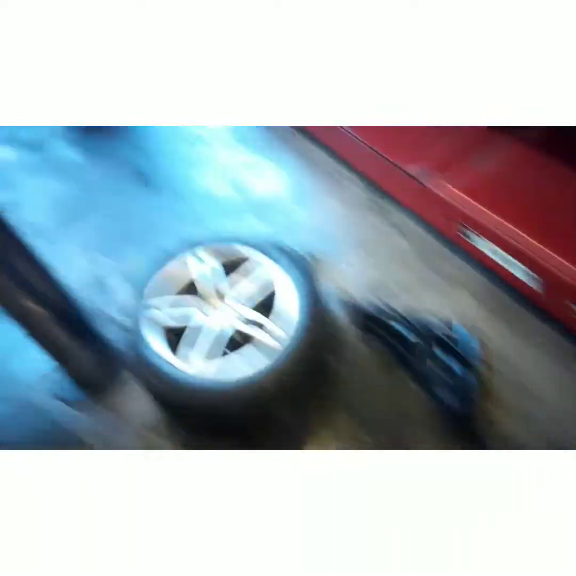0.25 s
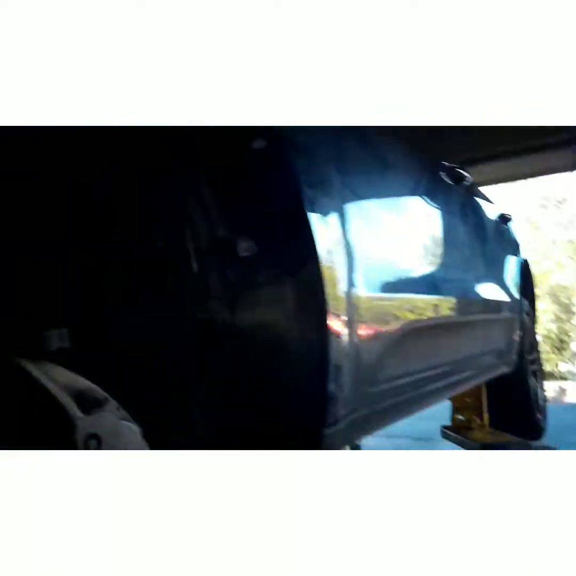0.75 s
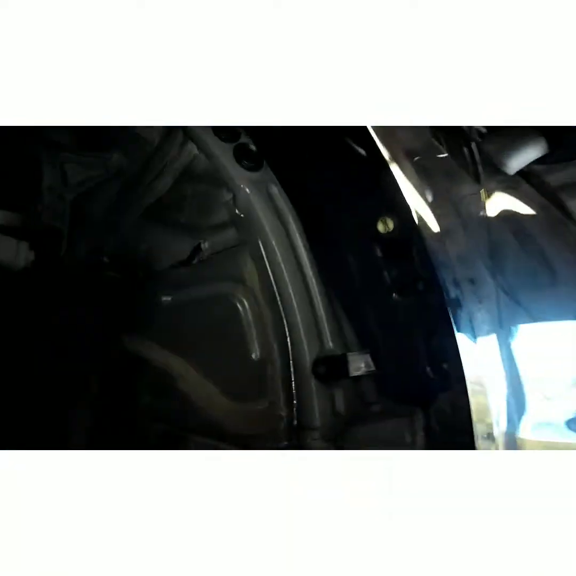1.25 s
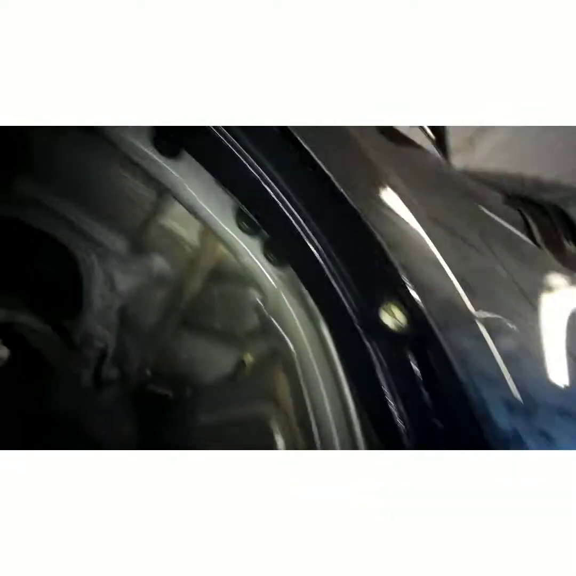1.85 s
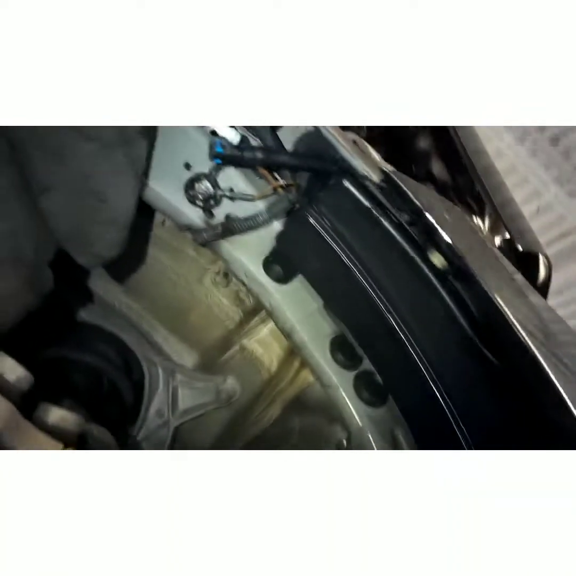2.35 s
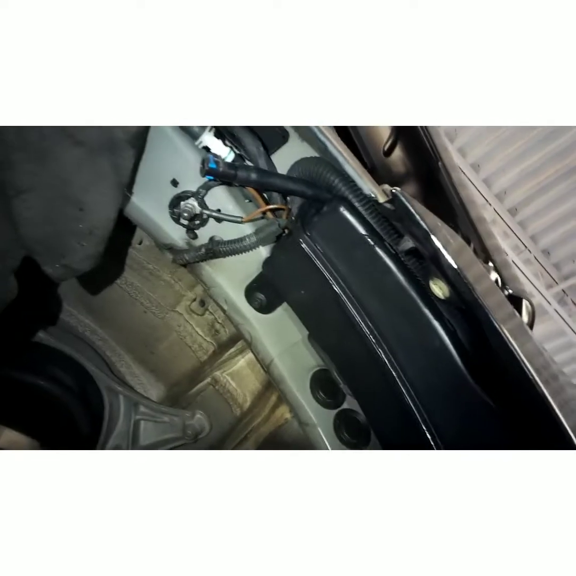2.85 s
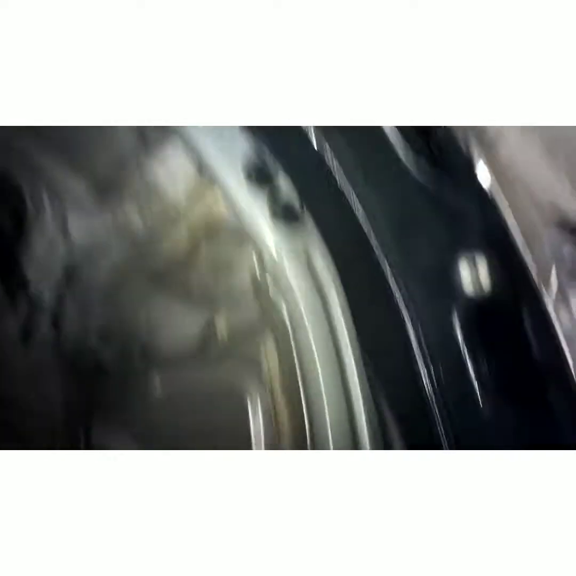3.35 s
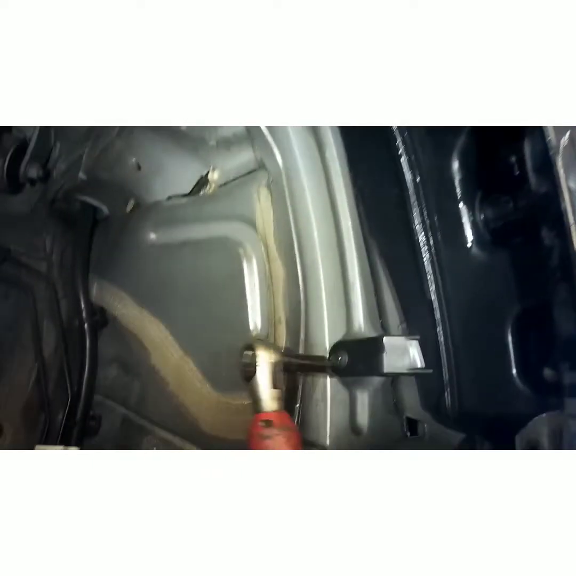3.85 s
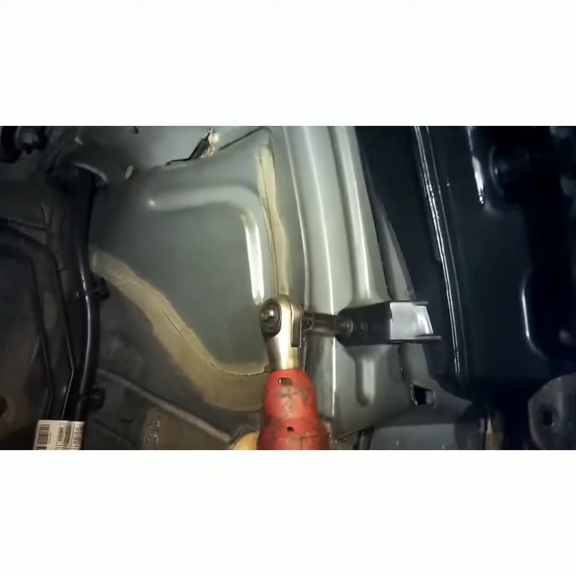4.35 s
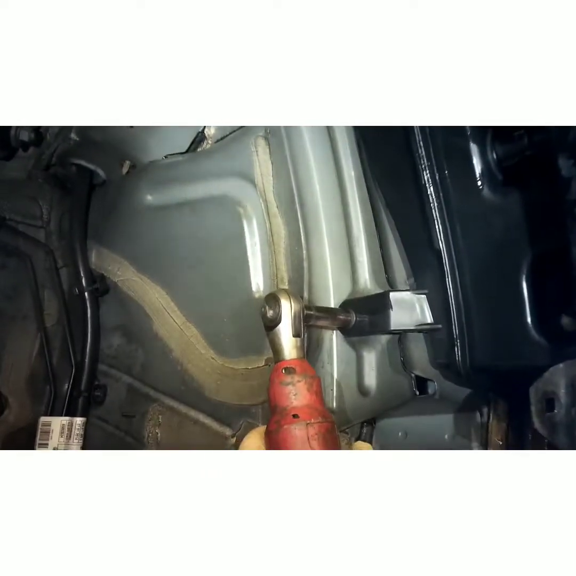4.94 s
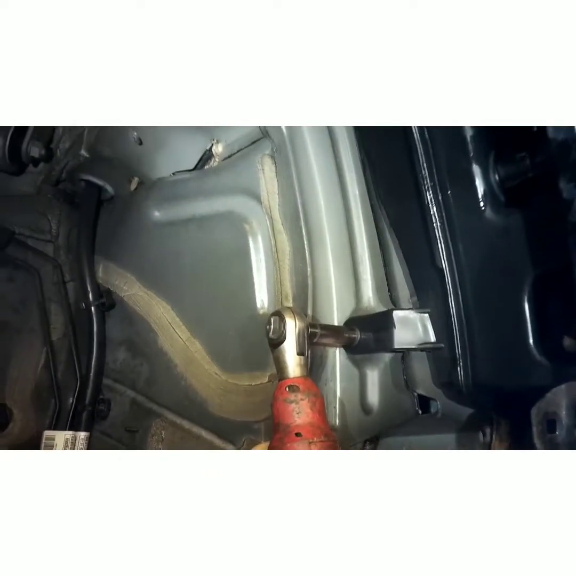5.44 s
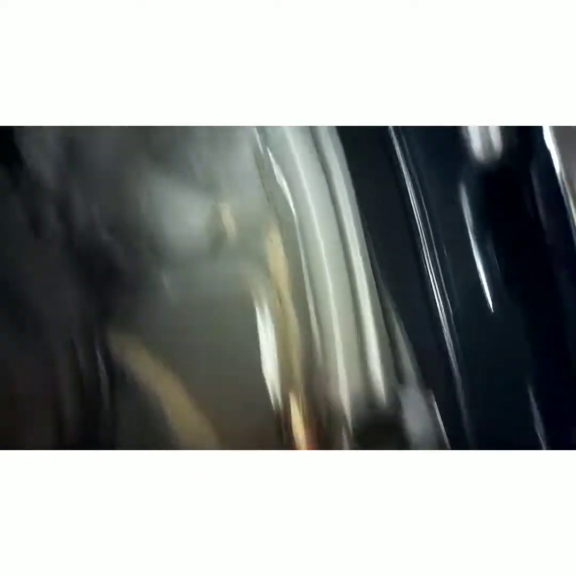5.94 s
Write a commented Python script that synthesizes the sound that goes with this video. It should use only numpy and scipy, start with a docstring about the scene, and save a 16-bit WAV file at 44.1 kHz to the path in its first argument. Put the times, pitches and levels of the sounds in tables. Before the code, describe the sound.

A close microphone hears quiet handling first: soft thuds, cloth rustle, scattered dry clicks over a wavering workshop hum. A short, crisp ratchet burst winds down in sharp ticks. After a pause, metal clacks on metal and the tool runs again, now loud, hollow and rattling through a car panel, its pitch sagging before the final heavy knocks and a short garage reverberation.

```python
"""Garage: a cordless ratchet is blipped in the air close by, clatters and coasts to a stop.
Its socket knocks onto a bolt in a wheel arch; the second run drives the bolt out and shakes the sheet metal.
Handling clicks, soft bumps, moving air, rustling sleeves and a wavering workshop hum lie underneath.
Crank-timed impulses and scraping noise ring modal filters of head, spring and panel; single contacts
ring the same bodies; filtered noise and sines make the background; a noise tail makes the room."""
import sys
import numpy as np
from scipy import signal
from scipy.fft import rfft, irfft
from scipy.io import wavfile
from scipy.ndimage import uniform_filter1d

SR = 44100
rng = np.random.default_rng(int(sys.argv[2]) if len(sys.argv) > 2 else 0)


def wrap_up_sound(samples):
    """Save the sound to the file named by the first command line argument, as 16-bit audio."""
    columns = np.atleast_2d(samples).T
    # keep every value between -1 and 1, then stretch to whole-number steps
    tamed = np.clip(columns, -1, 1)
    steps = np.round(tamed * 32767).astype(np.int16)
    wavfile.write(sys.argv[1], SR, steps)


N = 273947
TIME = np.arange(N) / SR  # s
GRID_HZ = np.fft.rfftfreq(8192, 1 / SR)

# workshop air, spectrum shape: f/Hz, relative density/dB
AIR_SPECTRUM = [(25, -25), (50, -20), (80, -8.5), (110, -13), (160, -13.5), (250, -18), (400, -17.5),
                (700, -23.5), (1250, -17.5), (2400, -29.5), (4000, -40), (8000, -46.5), (14000, -45.5),
                (15600, -65)]
# sleeve rustle, spectrum shape: f/Hz, relative density/dB
RUSTLE_SPECTRUM = [(200, -11), (700, -8.5), (1250, -3), (2000, -10), (2700, -14.5), (5300, -20.5),
                   (6500, -29), (14000, -40), (15600, -45)]
# arm movements that rustle the sleeves: middle t/s, half length/s, level/dB
ARM_MOVES = [(0, 0.081, -46.5), (0.546, 0.84, -56.5), (1.26, 0.22, -56.5), (3.36, 0.25, -54),
             (4.205, 0.26, -51.5), (6.077, 0.23, -42)]
# garage decay: f/Hz, t60/s
GARAGE_T60 = [(100, 0.59), (500, 0.62), (1500, 0.63), (4000, 0.46), (8000, 0.52), (15000, .3)]
# soft bumps: t/s, level/dB, f/Hz
SOFT_BUMPS = [(0.119, -27.5, 113), (.14, -30, 330), (.151, -28, 231), (2.226, -37, 170),
              (2.271, -36.5, 79.9), (2.319, -39.5, 91), (4.385, -31, 50.6)]
# clicks of the handled tool: t/s, peak level/dB, brightness f/Hz
HANDLING_CLICKS = [(0.731, -28.5, 4100), (0.762, -29.5, 8000), (.783, -29, 7900), (1.1225, -21.5, 4700),
                   (1.333, -29, 4200), (1.499, -29.5, 5980), (1.5123, -25, 5000), (2.961, -41, 16000),
                   (4.18, -40, 3520), (4.252, -36, 3200)]
# socket on bolt: t/s, peak level/dB, scrape/s, brightness f/Hz, thud level/dB, thud f/Hz, rebound step/dB
SOCKET_KNOCKS = [(3.8955, -9.5, 0.011, 3200, -23, 430, -31), (4.033, -2, 0.007, 4520, -23, 426, -24),
                 (5.886, -8.5, .003, 1500, -24.5, 253, -22), (5.9004, 0, 0.003, 1490, -8, 660, -11.5),
                 (6.02, -10, 0.027, 2800, -35.5, 790, -13)]
# single pawl clicks, mostly as the motor stops: t/s, peak level/dB, scrape/s
PAWL_CLICKS = [(1.87, -13.5, .003), (1.955, 3.5, 0.0011), (2.166, 1, 0.0009), (2.3855, -10.5, 0.0064),
               (2.417, -12.5, 0.0045), (2.439, -16, .0058), (2.455, -27, .002), (2.468, -8.5, .0018),
               (2.497, -14, 0.0048), (2.54, -15.5, 0.0018), (2.591, -26.5, .005)]
# ratchet head resonances: f/Hz, width/Hz, level/dB
HEAD_MODES = [(1078, 315, 0.5), (1283, 56, 5.5), (1700, 160, -9), (2060, 260, -1.5), (3370, 294, -6.5),
              (3860, 450, 1), (5070, 1200, -0.5), (7180, 680, -8), (8640, 1700, -7), (10830, 600, -8.5),
              (12360, 1100, 4), (14200, 3500, -6)]
# pawl spring resonances: f/Hz, width/Hz, level/dB
SPRING_MODES = [(12000, 130, -0.5), (12140, 290, -2), (12900, 590, -7), (13900, 1100, -14)]
# wheel arch resonances: f/Hz, width/Hz, level shaken by the tool/dB, level knocked through the bolt/dB
PANEL_MODES = [(374.5, 24, -9.5, -8.5), (423, 36, -8, -23), (523.4, 23, -13, -7.5), (740, 17, -11, -3),
               (914, 99, -14, -14.5), (987, 36, -5, -18), (1105, 63, -7, -3), (1193, 83, -7.5, -36),
               (1326, 47, -3, -18), (1401.5, 42, 2.5, 1), (1485, 65, -18, -4.5), (1622, 72, -1.5, -6.5),
               (1696, 36, -13, -19), (1834, 62, -3, -1.5), (1928, 44, 0.5, -7), (2028, 124, -3.5, -8),
               (2183, 38, 0, -3.5), (2392.5, 38, -1.5, -4), (2479, 78, -5, -3), (2885, 115, -7.5, -26),
               (3040, 120, -12, -14), (3310, 520, -16.5, -18.5), (4170, 350, -17.5, -16),
               (5000, 820, -41, -25), (5500, 170, -15, -18), (5810, 75, -19.5, -23)]
# tool housing response: f/Hz, level/dB
HOUSING_RESPONSE = [(100, -22), (350, -16.5), (650, -3.5), (950, 4.5), (1300, 0.5), (1700, -23.5),
                    (4000, -53)]
# rocking bolt response: f/Hz, level/dB
WOBBLE_RESPONSE = [(40, -42), (110, -19.5), (190, -1), (300, -3.5), (420, 6), (600, -15), (1500, -61)]
# shading of the head inside the arch: f/Hz, level/dB
ARCH_SHADE = [(1000, -16.5), (5000, 7.5), (7000, 7.0), (8200, 4.5), (9500, 10),
              (11000, 0.5), (12200, -0.5), (14500, 3.5)]
# speed on the bolt: t/s, strokes per second/Hz
BOLT_SPEED_HZ = [(4.27, 52), (4.4, 101), (4.53, 113), (4.97, 112.8), (5.2, 99.5), (5.5, 87), (5.72, 68.5),
                 (5.88, 44)]
# shaking of the panel, before the surge: t/s, level/dB
PANEL_EFFORT_DB = [(4.275, -39.5), (4.322, -12.5), (4.4, -9), (4.46, -15.5), (4.6, -14), (5.03, -16),
                   (5.61, -15), (5.7, -17), (5.845, -19), (5.872, -34.5)]

AIR_DB = -53
BAND_EDGE_HZ = 15880
# chance ticks
TICKS_PER_S, TICK_DB, TICK_HZ = 1.3, -44.5, 4000
HANDLING_SCRAPE_S = 0.0041
# gap and thud pitch ratio from one rebound to the next
REBOUND_S, REBOUND_PITCH = 0.015, 0.46
# brightness of a 1 ms pawl scrape; longer ones dull by this power of length
PAWL_BRIGHT_HZ, PAWL_DULLING = 20000, 0.29
# start level of a run, relative to full
ONSET_DB = -32
# free run: trigger pressed, trigger let go, last even stroke
FREE_ON_S, FREE_OFF_S, FREE_END_S = 1.85, 1.9385, 2.383
# spin-up, then coast: drag alone halves speed in COAST_S, friction takes the rest
START_HZ, TOP_HZ, SPIN_UP_S, COAST_S, FRICTION_HZ_PER_S = 55, 108.1, .06, .2894, 23.74
# bolt run
BOLT_ON_S, BOLT_END_S = 4.275, 5.88
# pawl bites hardest as the bolt first gives; later the bolt comes loose
BITE_S, BITE_HALF_S, LOOSE_S, LOOSENING_S = 4.355, 0.037, 5.47, 0.015
# only a rasp above this pitch is left of the loose bolt's rattle
RASP_LOW_HZ = 1100


def gain_of(db):
    """Decibels to amplitude."""
    return 10 ** (np.asarray(db) / 20)


def evened(x):
    """Scales to rms 1."""
    return x / np.sqrt(np.mean(x ** 2) + 1e-20)


def read(points, hz):
    """Interpolates a spectrum on a log-frequency axis."""
    f, value = np.transpose(points)
    return np.interp(np.log(hz + 1), np.log(f + 1), value)


def curve(rows):
    """Control curve (t/s, value) at every sample."""
    rows = np.array(rows)
    return np.interp(TIME, rows[:, 0], rows[:, 1])


def swell(middle_s, half_s):
    """Gaussian rise to 1 and fall."""
    return np.exp(-((TIME - middle_s) / half_s) ** 2)


def envelope(start_s, attack_s, hold_s, fade_db_per_s):
    """Relative level in dB of a run that swells, holds and dies away."""
    age_s = np.maximum(TIME - start_s, 0)
    onset_db = ONSET_DB * np.exp(-age_s / attack_s)
    return onset_db - fade_db_per_s * np.maximum(age_s - hold_s, 0)


def add(mix, s, sound):
    """Adds a sound into the mix at time s."""
    part = mix[max(round(s * SR), 0):][:len(sound)]
    part += sound[:len(part)]


def drift(hz):
    """Slow random wander of rms 1, Gaussian low-pass at hz."""
    spectrum = rfft(rng.standard_normal(N))
    rolloff = np.exp(-(np.fft.rfftfreq(N, 1 / SR) / hz) ** 2)
    return evened(irfft(spectrum * rolloff, N))


def hiss(points):
    """Steady noise of rms 1 with a given spectrum."""
    spectrum = rfft(rng.standard_normal(N))
    gain = gain_of(read(points, np.fft.rfftfreq(N, 1 / SR)))
    return evened(irfft(spectrum * gain, N))


def resonant(modes, low_hz, top_hz):
    """Gain of a body radiating through its resonances, between two steep edges."""
    power = sum(gain_of(db) ** 2 / (1 + (2 * (GRID_HZ - hz) / width_hz) ** 2) ** 1.19
                for hz, width_hz, db in modes)
    low_edge = 1 + (low_hz / (GRID_HZ + 1)) ** 6
    top_edge = 1 + (GRID_HZ / top_hz) ** 6
    return np.sqrt(power / low_edge / top_edge)


def panel_modes(column):
    """Wheel arch modes, weighted for the running tool (column 2) or a knock (column 3)."""
    return [(row[0], row[1], row[column]) for row in PANEL_MODES]


def soft(bright_hz):
    """Treble loss of a softer contact."""
    return 1 / np.sqrt(1 + (GRID_HZ / bright_hz) ** 4)


def ring(x, gain):
    """Passes x through the minimum-phase filter that has this gain."""
    log_gain = np.log(np.maximum(np.r_[gain, gain[-2:0:-1]], 1e-5))
    response = np.exp(np.conj(signal.hilbert(log_gain)))
    taps = np.fft.ifft(response).real[:len(gain)]
    return signal.oaconvolve(x, taps)[:len(x)]


def scatter(x):
    """A jolt runs to and fro along the socket extension: all-passes spread it over milliseconds."""
    for delay in (23, 41, 67):
        gap = np.zeros(delay)
        x = signal.lfilter(np.r_[.6, gap, 1], np.r_[1, gap, .6], x)
    return x


def hit(gain, peak_db, scrape_s, snap):
    """A contact snaps, scrapes briefly and rings a body."""
    t = TIME[:6000]
    force = rng.standard_normal(len(t)) * np.exp(-t / scrape_s)
    force /= np.linalg.norm(force)
    force[0] += snap
    sound = ring(force, gain)
    return gain_of(peak_db) * sound / abs(sound).max()


def clicks(rows):
    """Small blows ring the ratchet head."""
    out, head = np.zeros(N), resonant(HEAD_MODES, low_hz=763, top_hz=17000)
    for s, peak_db, scrape_s, bright_hz in rows:
        add(out, s, hit(head * soft(bright_hz), peak_db, scrape_s, snap=0.62))
    return out


def strokes(speed_hz, landing_s, offset, scrape_s, uneven_db):
    """One blow per crank turn, offset turns after the one at landing_s: impulses, and their scrapes."""
    turns = np.cumsum(speed_hz) / SR
    turns = turns + .007 * drift(45)  # gear play makes strokes early or late
    phase = turns - np.interp(landing_s, TIME, turns) - offset
    at = np.flatnonzero(np.diff(np.floor(phase)) > 0)
    blows = np.zeros(N)
    blows[at] = gain_of(uneven_db * rng.standard_normal(N)[:len(at)])
    age = TIME[:2000] / scrape_s
    grip = signal.oaconvolve(blows, age * np.exp(-age))[:N]  # teeth bite, then slip free
    return evened(blows), evened(grip * rng.standard_normal(N))


def played(x, level_db, span_s):
    """Levels out a running sound's rms and holds it at level_db within span_s."""
    power = uniform_filter1d(uniform_filter1d(x ** 2, size=2200), size=1500)
    inside = (TIME > span_s[0]) & (TIME < span_s[1])
    running = uniform_filter1d(1. * inside, size=300)
    return x / np.sqrt(abs(power) + 1e-12) * gain_of(level_db) * running


def garage(x):
    """Diffuse tail: each band dies at its own speed; the walls swallow the treble."""
    hz, t, z = signal.stft(rng.standard_normal(SR), SR, nperseg=256)
    decay = gain_of(-60 * t / read(GARAGE_T60, hz)[:, None])
    z = z * decay / np.sqrt(1 + (hz[:, None] / 6000) ** 4)
    tail = signal.istft(z, SR, nperseg=256)[1][:SR] * np.minimum(TIME[:SR] / .02, 1)
    return signal.fftconvolve(x, tail / np.linalg.norm(tail))[:N]


def bodywork(x):
    """Quick, bright reflections off the car's nearby panels."""
    t = TIME[:8000]
    tail = rng.standard_normal(len(t)) * gain_of(-60 * t / .14) * (t > .002)
    return x + gain_of(-10) * signal.oaconvolve(x, tail / np.linalg.norm(tail))[:N]


def workshop():
    """Moving air and rustling sleeves as noise; a wavering hum and a small steel part's dying ring as sines."""
    air = gain_of(AIR_DB) * hiss(AIR_SPECTRUM) * gain_of(0.49 * drift(3))
    hum_turns = np.cumsum(113 + 5 * drift(7)) / SR
    hum = gain_of(-53.0 + 2.5 * drift(6.1)) * np.sin(2 * np.pi * hum_turns)
    moving = sum(gain_of(db) * swell(s, half_s) for s, half_s, db in ARM_MOVES)
    rustle = hiss(RUSTLE_SPECTRUM) * moving * gain_of(1.2 * drift(25))
    steel_db = -52 - 60 * TIME / 0.48 + 3 * drift(30)
    steel = gain_of(steel_db) * np.sin(2 * np.pi * 8020 * TIME)
    return air + hum + rustle + steel


def bumps():
    """Soft bumps: one heavily damped swing each."""
    out, t = np.zeros(N), TIME[:4000]
    for s, db, hz in SOFT_BUMPS:
        add(out, s, -gain_of(db) * np.sin(2 * np.pi * hz * t) * np.exp(-t * hz * 1.34))
    return out


def handling():
    """The tool clicks in the hand, with fainter ticks at random times."""
    tick_times_s = rng.uniform(0, N / SR, 40)[:round(TICKS_PER_S * N / SR)]
    ticks = [(s, TICK_DB, TICK_HZ) for s in tick_times_s]
    return clicks([(s, db, HANDLING_SCRAPE_S, bright_hz) for s, db, bright_hz in HANDLING_CLICKS + ticks])


def knocks():
    """The socket rings the panel and rebounds twice; the wing answers with a dull thud."""
    out, panel = np.zeros(N), resonant(panel_modes(column=3), low_hz=244, top_hz=7600)
    for s, peak_db, scrape_s, bright_hz, thud_db, thud_hz, rebound_db in SOCKET_KNOCKS:
        for k in range(3):
            at_s, hz = s + k * REBOUND_S, thud_hz * REBOUND_PITCH ** k
            wing = resonant([(hz, 0.16 * hz, 0)], low_hz=.5 * hz, top_hz=2 * hz)
            knock = hit(panel * soft(bright_hz), peak_db + k * rebound_db, scrape_s, snap=1.6)
            add(out, at_s, scatter(knock))
            add(out, at_s, hit(wing, thud_db + k * rebound_db, scrape_s, snap=1.6))
    return out


def pawl_clicks():
    """Single clicks ring the head and, through it, the spring; shorter ones are brighter."""
    rows = []
    for s, peak_db, scrape_s in PAWL_CLICKS:
        bright_hz = PAWL_BRIGHT_HZ / (scrape_s / .001) ** PAWL_DULLING
        rows.append((s, peak_db, scrape_s, bright_hz))
    out = clicks(rows)
    return out + gain_of(-10) * ring(out, resonant(SPRING_MODES, low_hz=9000, top_hz=16000))


def free_speed():
    """Strokes per second of the unloaded motor: quick spin-up, then coast."""
    driven_hz = np.interp(TIME, [FREE_ON_S, FREE_ON_S + SPIN_UP_S], [START_HZ, TOP_HZ])
    coasted_s = np.clip(TIME, FREE_OFF_S, FREE_END_S) - FREE_OFF_S
    return driven_hz / (1 + coasted_s / COAST_S) - FRICTION_HZ_PER_S * coasted_s


def free_run():
    """The yoke swings out and back each turn; the pawl snaps both ways over the gear whirr."""
    landing_s, return_turn = 2.104, .65
    speed_hz, span_s = free_speed() * (TIME > FREE_ON_S), (FREE_ON_S, FREE_END_S)
    out, out_scrape = strokes(speed_hz, landing_s, 0, scrape_s=.0016, uneven_db=1.3)
    back, back_scrape = strokes(speed_hz, landing_s, return_turn, scrape_s=.0016, uneven_db=1)
    slack = np.clip(75 / free_speed() - .5, .1, .9)  # return snap stands out as the motor slows
    snaps = out_scrape + slack * back_scrape + gain_of(-1) * scatter(out + slack * back)
    whirr = gain_of(1.5) * free_speed() / TOP_HZ * rng.standard_normal(N)  # loudest at speed
    drive = snaps + whirr

    level_db = envelope(FREE_ON_S, attack_s=.021, hold_s=0.26, fade_db_per_s=37.5)
    head_gain = resonant(HEAD_MODES, low_hz=800, top_hz=17000)
    head = played(ring(drive, head_gain), level_db - 18.0, span_s)

    housing_db = envelope(FREE_ON_S, attack_s=.028, hold_s=.13, fade_db_per_s=21.5) - 29.0
    housing = played(ring(drive, gain_of(read(HOUSING_RESPONSE, GRID_HZ))), housing_db, span_s)

    # pawl drops into the next tooth and flicks the spring
    flicks = strokes(speed_hz, landing_s, .05, scrape_s=.0006, uneven_db=2.5)[1]
    flicks = flicks + slack * strokes(speed_hz, landing_s, return_turn, scrape_s=.0006, uneven_db=3)[1]
    spring_gain = resonant(SPRING_MODES, low_hz=8950, top_hz=16000)
    spring = played(ring(flicks, spring_gain), level_db - 23.5, span_s)
    return head + housing + spring


def bolt_run():
    """Each stroke jolts the panel through the bolt; the socket rattles in between."""
    landing_s, return_turn = 5.807, .42
    speed_hz, span_s = curve(BOLT_SPEED_HZ) * (TIME > BOLT_ON_S), (BOLT_ON_S, BOLT_END_S)
    out, out_scrape = strokes(speed_hz, landing_s, 0, scrape_s=0.0026, uneven_db=2.0)
    back, back_scrape = strokes(speed_hz, landing_s, return_turn, scrape_s=0.0019, uneven_db=0.5)
    pace = curve(BOLT_SPEED_HZ) / 110  # at speed, rattle fills the gaps between strokes
    between = gain_of(3) * back_scrape + gain_of(3.5) * rng.standard_normal(N)
    rattle = evened(out_scrape + pace * between)
    jolts = scatter(out + gain_of(-17.5) * pace * back)  # all scatter alike, so strokes keep a pitch
    loose = .5 + .5 * np.tanh((TIME - LOOSE_S) / LOOSENING_S)  # 0 tight, 1 loose
    rasp = ring(rattle, 1 / np.sqrt(1 + (RASP_LOW_HZ / (GRID_HZ + 1)) ** 4))
    drive = jolts + gain_of(-1.5) * pace * ((1 - loose) * rattle + loose * rasp)
    surge = gain_of(1.1 * drift(14))  # thread binds and frees unevenly

    panel_gain = resonant(panel_modes(column=2), low_hz=280, top_hz=6300)
    panel = played(ring(drive, panel_gain), curve(PANEL_EFFORT_DB), span_s)

    bite_db = 7 * swell(BITE_S, BITE_HALF_S)
    head_db = envelope(BOLT_ON_S, attack_s=0.014, hold_s=0.92, fade_db_per_s=8) + bite_db - 29.5
    head_gain = resonant(HEAD_MODES, low_hz=784, top_hz=17000) * gain_of(read(ARCH_SHADE, GRID_HZ))
    head = played(ring(rattle, head_gain), head_db, span_s)

    rocking = strokes(speed_hz, landing_s, 0, scrape_s=.002, uneven_db=.6)[0]
    tight_db = envelope(BOLT_ON_S, attack_s=0.018, hold_s=0.35, fade_db_per_s=12.5) - 42
    loose_db = -35.5 + 12 * (1 - pace)  # slower strokes rock the bolt further
    wobble_db = (1 - loose) * tight_db + loose * loose_db
    wobble = played(ring(rocking, gain_of(read(WOBBLE_RESPONSE, GRID_HZ))), wobble_db, span_s)
    return surge * (panel + head) + wobble


def scene():
    """The near tool is almost dry; the panel throws its sound into the garage."""
    background = workshop() + bumps()
    handled, blows = handling(), knocks()
    near, running = bodywork(free_run() + pawl_clicks()), bolt_run()
    mono = background + handled + blows + near + running
    spread = ring(near, soft(3000))  # only the tool's lower notes fill the room
    near_send = gain_of(-13.5) * spread + gain_of(-17.5) * handled
    panel_send = gain_of(-10.5) * running + gain_of(-27.0) * blows
    mono = mono + garage(near_send + panel_send)
    # close up, the shortest waves reach the two channels a little differently
    treble = ring(near, 1 / (1 + (4800 / (GRID_HZ + 1)) ** 12))
    side = gain_of(-17) * scatter(treble)
    return np.array([mono + side, mono - side])


def record(dry):
    """The microphone rounds off the highest peaks; then a low-pass limits the band."""
    ceiling = gain_of(-4.0)
    rounded = dry / (1 + (dry / ceiling) ** 6) ** (1 / 6)
    taps = signal.firwin(511, BAND_EDGE_HZ, window=("kaiser", 9), fs=SR)
    return signal.oaconvolve(rounded, taps[None], "same")


dry = scene()
out = record(dry)
wrap_up_sound(out)
```